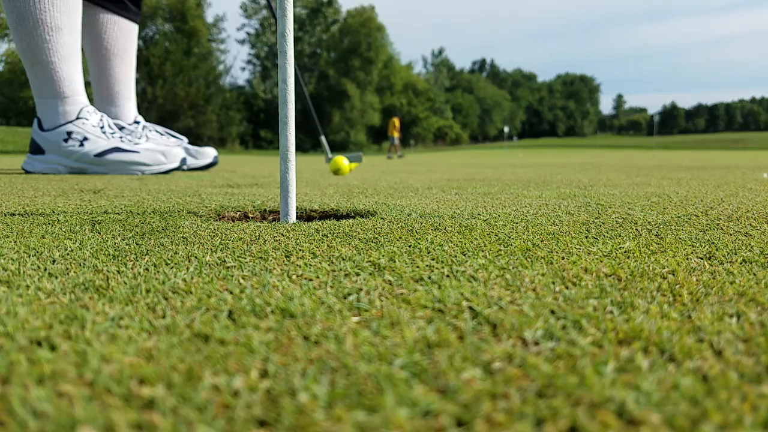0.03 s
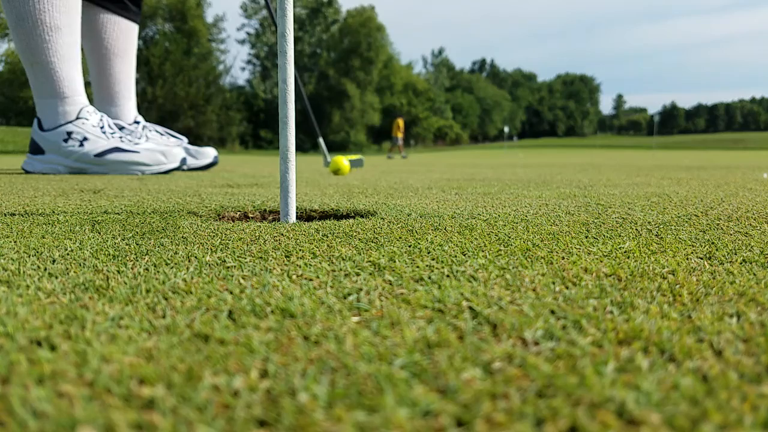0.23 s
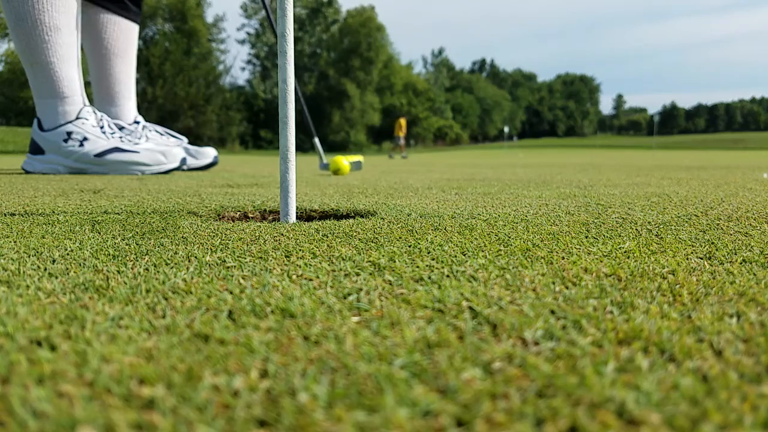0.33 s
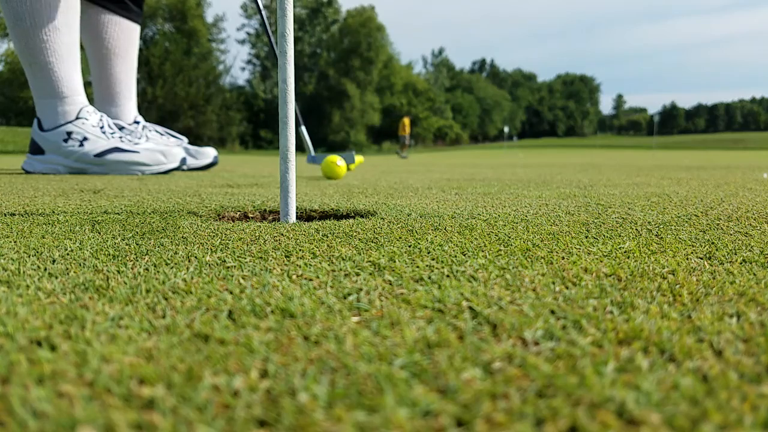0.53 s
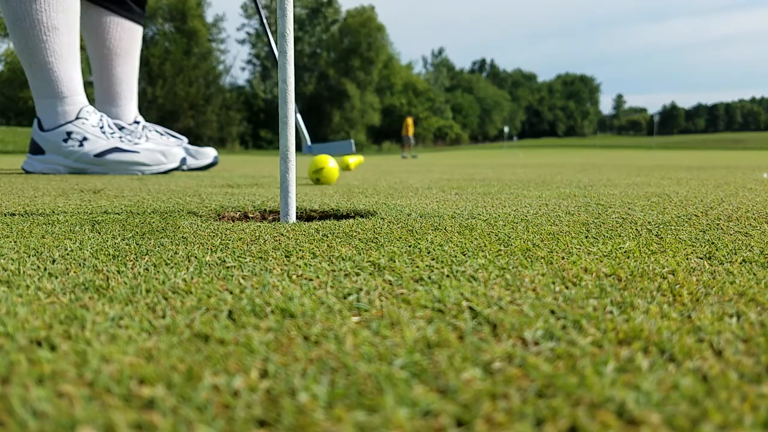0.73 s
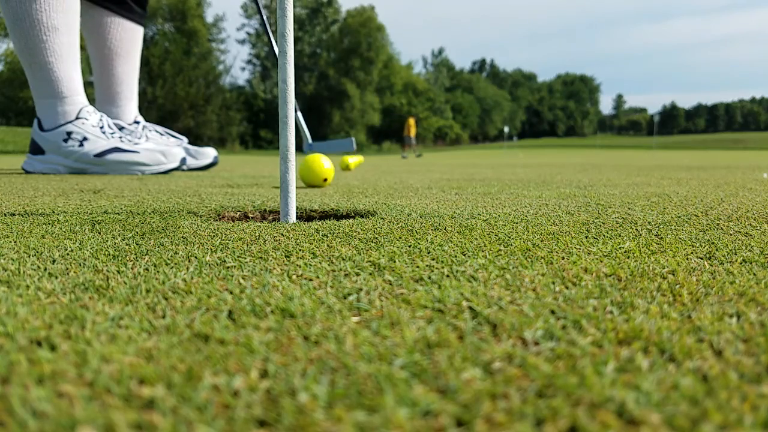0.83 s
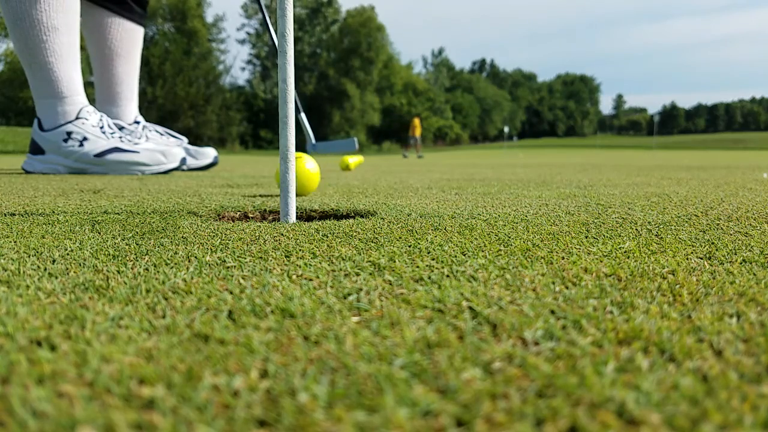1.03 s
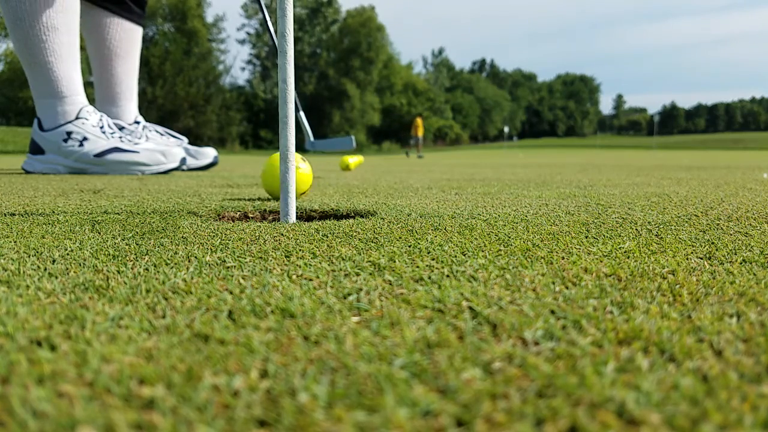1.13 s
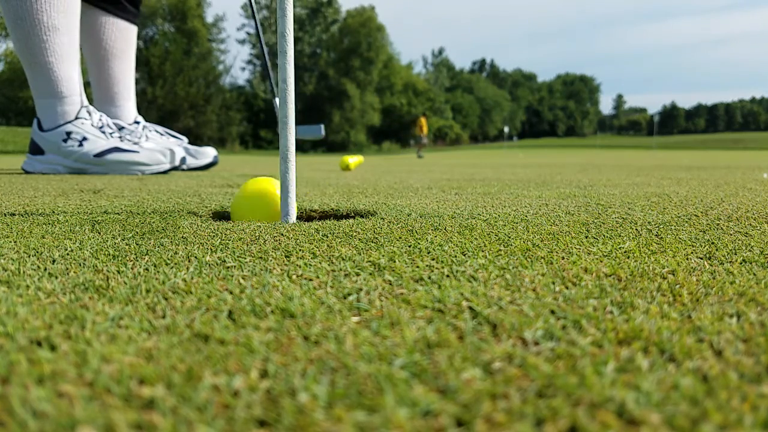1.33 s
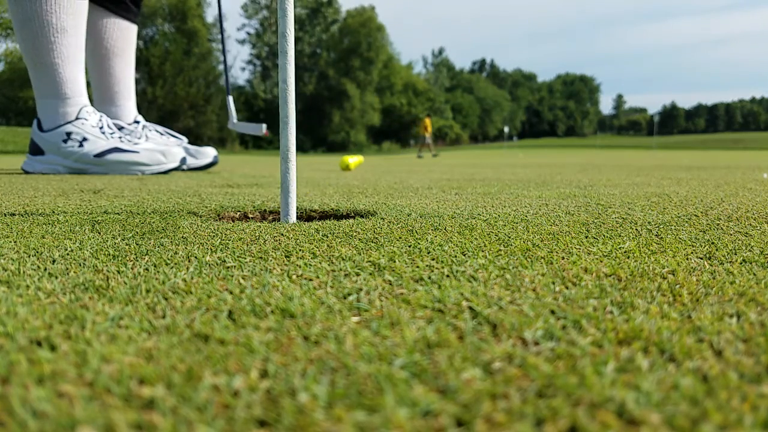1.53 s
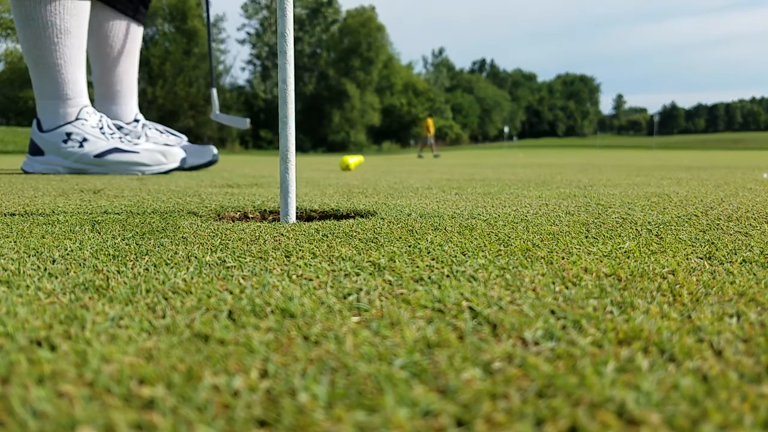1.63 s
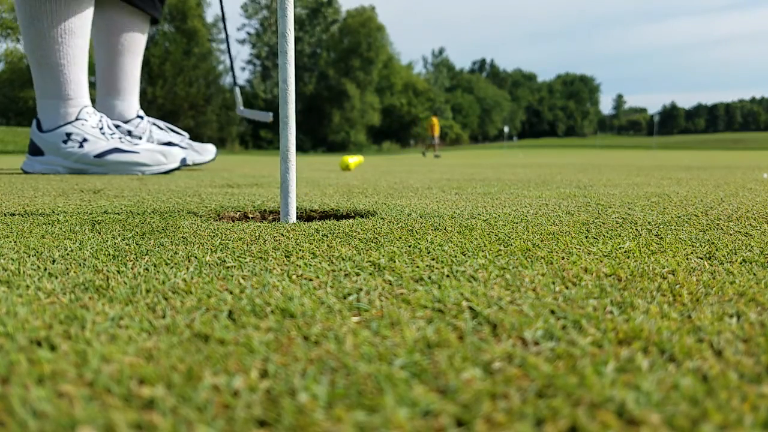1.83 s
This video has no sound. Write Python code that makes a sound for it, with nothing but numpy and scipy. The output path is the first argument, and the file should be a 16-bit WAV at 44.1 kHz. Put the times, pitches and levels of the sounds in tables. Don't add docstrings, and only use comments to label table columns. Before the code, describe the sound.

Golf putt: one crisp click, a quiet roll, then hollow clattering knocks in the hole

```python
import sys
import numpy as np
from scipy import signal
from scipy.fft import rfft, irfft, next_fast_len
from scipy.io import wavfile
from scipy.ndimage import uniform_filter1d, map_coordinates

SR = 44100
rng = np.random.default_rng(int(sys.argv[2]) if len(sys.argv) > 2 else 0)


def output_pcm(signal):
    pcm = np.clip(np.atleast_2d(signal).T, -1, 1) * 32767
    wavfile.write(sys.argv[1], SR, np.round(pcm).astype(np.int16))


def amplitude_ratio(level_db):
    exponent = np.asarray(level_db, float) / 20
    return 10 ** exponent


N = 83790

# [t/s, level/dB, tyre band level/dB]
TRAFFIC = [
    (0, -34, -6),
    (.17, -35.5, -2),
    (.3, -34, 5.5),
    (.62, -34, 5.5),
    (.8, -33, 3),
    (1.05, -33, 4),
    (1.15, -33, 1.5),
    (1.49, -32.5, 2.5),
    (1.65, -35.5, 2.5),
    (1.9, -39, -1),
]
# [f/Hz, level/dB]
DRONE_COLOUR = [(20, -23), (45, -6.5), (140, 1), (300, -8.5), (1200, -13.5), (2000, -20.5), (3500, -38),
                (6000, -49)]
# [f/Hz, likeness 0-1]
TRAFFIC_LIKENESS = [(30, .6), (130, .95), (400, .85), (750, .94), (1300, .88), (2000, .55), (3500, .2)]
# [f/Hz, level/dB]
HISS_COLOUR = [(1500, -38), (3000, 8.5), (6000, -11.5), (9500, 0), (12000, -3), (15500, 3)]
# [f/Hz, level/dB]
LEFT_OVER_RIGHT_DB = [(30, 11), (100, 8.8), (800, 9.5), (1500, 11.5), (6000, 10), (8500, 16), (10500, 10),
                      (15000, 13)]
# [t/s, f/Hz, level/dB]
ENGINE_NOTE = [
    (0, 199.3, -46),
    (.2, 231.3, -43),
    (.27, 199.7, -30.5),
    (0.331, 250.9, -35.5),
    (.4, 290.2, -39),
    (.5, 290.9, -44),
    (1.05, 250, -49.5),
    (1.15, 240.4, -33.5),
    (1.3, 252.4, -39.5),
    (1.4, 209.6, -31.5),
]
# [t/s, level/dB]
GRASS_FLICKS = [
    (1.168, -50),
    (1.202, -41),
]
# [f/Hz, level/dB, time to fall 60 dB/s]
PUTTER_HEAD = [(3980, -8, 0.01), (5230, -27, 0.008), (15400, -38, .006), (12000, -42, .004),
               (7150, -24, 0.0056), (8040, -20, 0.0076), (9100, -16.5, 0.0041), (10100, -33, .004),
               (2700, -11, 0.0077)]
# [t/s, level/dB, attack/s, hold/s, f/Hz]
CUP_HOLLOW = [(1.409, -23, 0.0019, 0.011, 1116), (1.4152, -15, 0.00064, 0.0026, 1170),
              (1.4195, -12, 0.00078, 0.0043, 1040), (1.431, -18, 0.0025, 0.0027, 1095),
              (1.4475, -15.5, 0.00079, 0.0037, 1187), (1.4535, -4, 0.00845, 0.0013, 1043),
              (1.4665, -19, .001, 0.0033, 1210), (1.476, -14, 0.0011, 0.0013, 1036),
              (1.484, -18, 0.00092, 0.002, 1100), (1.4986, -23, 0.00063, 0.0014, 1250),
              (1.509, -28, 0.0012, 0.0045, 1000), (1.5313, -8.5, 0.0008, 0.014, 1045),
              (1.545, -14, 0.0013, 0.003, 1177), (1.552, -14, 0.0045, 0.0066, 1085),
              (1.589, -16, 0.00051, 0.0019, 1030), (1.600, -19, 0.0023, 0.0056, 1055),
              (1.611, -22, .002, 0.0073, 1110)]
# [t/s, level/dB, attack/s, hold/s, f/Hz]
CUP_UPPER = [(1.4165, -26, 0.00081, 0.0027, 1960), (1.421, -26, .001, 0.0022, 2330),
             (1.432, -35, 0.00087, 0.0018, 2180), (1.4415, -30, 0.00093, .002, 1940),
             (1.4485, -29.5, 0.00055, .0015, 2650), (1.4495, -33, .0005, .0015, 1950),
             (1.462, -26, .002, 0.0033, 2110), (1.482, -30.5, .002, 0.0037, 2104),
             (1.497, -34, 0.00104, .004, 2150), (1.508, -35, .001, .004, 2230),
             (1.530, -14.5, 0.00081, 0.0015, 2180), (1.532, -14.5, 0.0013, 0.011, 1903),
             (1.552, -24, 0.002, 0.005, 2030), (1.591, -22, 0.0015, 0.008, 1918)]
# [t/s, level/dB, attack/s, hold/s, f/Hz]
CUP_THUDS = [(1.416, -18.5, 0.0016, 0.0034, 436), (1.438, -17, 0.0011, 0.013, 410),
             (1.458, -17, 0.0037, 0.016, 418.6), (1.503, -22, 0.0083, 0.0184, 421),
             (1.530, -19.5, 0.0041, 0.0134, 420), (1.545, -23.5, 0.0057, 0.038, 235),
             (1.548, -18.5, 0.0027, 0.0057, 423), (1.589, -19.5, 0.0014, 0.0027, 480),
             (1.585, -26.5, 0.0079, 0.06, 238), (1.2, -29.5, 0.0091, 0.043, 200),
             (1.601, -16.5, 0.0013, 0.0047, 414), (1.611, -21, 0.0016, 0.0073, 380),
             (1.602, -28, .001, .003, 790)]
# [t/s, crack level/dB, ring level/dB, treble tilt/dB an octave]
WALL_KNOCKS = [
    (1.4092, -20, -34, -2.5),
    (1.4165, -28, -24.5, 2.5),
    (1.4405, -20.5, -44, -3.5),
    (1.449, -23.5, -38, 0.5),
    (1.421, -18, -33, -6.5),
    (1.4565, -21.5, -20, -0.6),
    (1.466, -36, -32, 2),
    (1.4975, -46, -54, 7),
    (1.512, -39, -54, 1),
]
# [f/Hz, level/dB, time to fall 60 dB/s]
WALL_TONES = [(1450, 2.5, 0.021), (2330, -2, 0.017), (3430, 0.5, 0.016), (4030, -6, 0.056),
              (4290, -10, 0.032), (5600, -10, 0.016), (6600, -19.5, 0.13), (7050, -23, .06),
              (8800, -19, .025), (9640, -25, .03), (10300, -18.5, 0.028), (11500, -18, 0.018),
              (14400, -13, .03), (15400, -12, .035)]
# [t/s, crack level/dB, ring level/dB, treble tilt/dB an octave]
STICK_KNOCKS = [
    (1.5297, -13.5, -14.5, 2.46),
]
STICK_PITCHES = [1420, 2300, 4060, 3560, 3920, 6620, 7030, 7490, 9640, 10300, 10640, 11490, 13530, 15570]
# [level/dB, time to fall 60 dB/s]
STICK_STRENGTHS = [(12, 0.014), (-2, 0.011), (-10.5, 0.12), (8.5, 0.014), (-3.5, 0.074), (-15.5, 0.069),
                   (-20, 0.087), (-19, 0.12), (-8, 0.046), (-17, .04), (-21, 0.13), (-14.5, 0.046),
                   (-23, 0.11), (-22, .05)]
# [t/s, crack level/dB, ring level/dB, treble tilt/dB an octave]
FOOT_KNOCKS = [
    (1.5885, -23.5, -31.5, -1.6),
    (1.592, -34, -33, 0.5),
    (1.6235, -54, -58, 8),
]
# [f/Hz, level/dB, time to fall 60 dB/s]
FOOT_TONES = [(1460, 8, 0.017), (2900, -5, .015), (3960, -3.5, 0.076), (4190, -4, .05), (6570, -20, .04),
              (7500, -16, .03), (8200, -20, .02), (12400, -13, .015), (15570, -12, .04), (10600, -8.5, 0.1),
              (13530, -11, .08), (14250, -9, .035)]
# [f/Hz, level/dB]
CRACK_COLOUR = [(300, 10.5), (1400, -1), (3000, -1), (6000, -14.5), (12000, -20.5), (16000, -34)]
# [f/Hz, level/dB]
HOLE_SHADE = [(1000, -2.1), (2000, 1), (4000, -1), (8000, -11), (13000, -6)]

TRAFFIC_LAG_S, PUTT_LAG_S, CUP_LAG_S = .00038, .00004, .00013


def unit(x):
    return x / np.sqrt(np.mean(x ** 2) + 1e-20)


def along(points, hz):
    f, v = np.transpose(points)
    return np.interp(np.log(hz + 1), np.log(f + 1), v)


def wobble(rate):
    knots = rng.standard_normal(int(N * rate / SR) + 4)
    return map_coordinates(knots, [np.arange(N) * rate / SR])


def filtered(x, response):
    m = next_fast_len(x.shape[-1] + 8192)
    return irfft(rfft(x, m) * response(np.fft.rfftfreq(m, 1 / SR)), m)[..., :x.shape[-1]]


def band(centre_hz, width_hz):
    return lambda hz: np.exp(-.5 * ((hz - centre_hz) / width_hz) ** 2)


def add(track, s, x):
    track[round(s * SR):][:len(x)] += x


def pair(left, right, lag_s):
    def path(hz):
        return amplitude_ratio(-along(LEFT_OVER_RIGHT_DB, hz)) * np.exp(-2j * np.pi * hz * lag_s)
    return np.array([left, filtered(right, path)])


def patchy(patchy_db):
    z = signal.stft(rng.standard_normal((2, N)), nperseg=512)[2]
    field = uniform_filter1d(rng.standard_normal(z.shape[1:]), 4, 0)
    field = uniform_filter1d(field, 10, 1)
    return signal.istft(z * amplitude_ratio(patchy_db * unit(field)), nperseg=512)[1][:, :N]


def traffic():
    s, level_db, tyre_db = np.transpose(TRAFFIC)
    t = np.arange(N) / SR
    level = np.interp(t, s, level_db)
    drone = unit(filtered(patchy(patchy_db=.7), lambda hz: amplitude_ratio(along(DRONE_COLOUR, hz))))
    tyres = unit(filtered(patchy(patchy_db=2.5), band(centre_hz=725, width_hz=105)))
    tyres = tyres * amplitude_ratio(-12 + np.interp(t, s, tyre_db) + 1.4 * wobble(9))
    near, spread = (drone + tyres) * amplitude_ratio(level + 3.5 + .25 * wobble(7))
    air = rng.standard_normal((2, N))
    air = unit(filtered(air, lambda hz: amplitude_ratio(along(HISS_COLOUR, hz)) * (hz > 1500)))
    air = air * amplitude_ratio(-52 + 0.65 * (level - level_db.mean()))

    def alike(hz):
        return np.clip(along(TRAFFIC_LIKENESS, hz), 0, 1)
    right = filtered(near, alike) + filtered(spread, lambda hz: np.sqrt(1 - alike(hz) ** 2))
    return pair(near + air[0], right + air[1], TRAFFIC_LAG_S)


def engine():
    s, hz, db = np.transpose(ENGINE_NOTE)
    t = np.arange(N) / SR
    level_db = np.interp(t, s, db, right=-90) + 3.5 * wobble(25.86)
    pitch_hz = np.interp(t, s, hz) + 8 * wobble(29.35)
    return amplitude_ratio(level_db) * np.sin(2 * np.pi * np.cumsum(pitch_hz) / SR)


def cricket():
    start_s, gap_s, chirp_s = .055, 0.21, 0.094
    phase = (np.arange(N) / SR - start_s) / gap_s
    gate = np.sin(np.pi * np.clip(phase % 1 * gap_s / chirp_s, 0, 1)) * (phase > 0) * (phase < 7)
    noise = unit(filtered(rng.standard_normal(N), band(centre_hz=9950, width_hz=150)))
    return amplitude_ratio(-64) * gate * noise


def grass():
    out, t = np.zeros(N), np.arange(SR // 20) / SR
    for s, db in GRASS_FLICKS:
        noise = unit(filtered(rng.standard_normal(len(t)), band(centre_hz=13820, width_hz=1800)))
        add(out, s, amplitude_ratio(db - 60 * t / .02) * noise)
    return out


def putt():
    putt_s, contact_s = .40755, 0.00029
    t = np.arange(N) / SR - putt_s

    def bump(s, wide):
        return np.sin(np.pi * np.clip((t - s) / wide, 0, 1)) ** 2
    push = bump(0, contact_s)
    rebound = amplitude_ratio(-3) * bump(0.00043, 2.22 * contact_s)
    echo = amplitude_ratio(-19) * bump(0.00093, contact_s)
    u = np.maximum(t - 0.000307, 0)
    ring = np.zeros(N)
    for hz, db, t60 in PUTTER_HEAD:
        ring += amplitude_ratio(db - 60 * u / t60) * np.sin(2 * np.pi * hz * u) * (1 - np.exp(-u / 0.00053))
    thump = amplitude_ratio(-19.5 - 60 * u / .012) * np.sin(2 * np.pi * 327 * u)
    return amplitude_ratio(-4.5) * (push - rebound + echo + ring - thump)


def rings(rows, t60, rise_hz, unsteady=1):
    out, t = np.zeros(N), np.arange(SR // 8) / SR
    waver = unsteady * .45 * wobble(180)
    for s, db, attack, hold, hz in rows:
        sag_db = 3.5 * np.clip((t - attack) / hold, 0, 1)
        fade_db = 60 * np.maximum(t - attack - hold, 0) / t60
        shape = np.clip(t / attack, 0, 1) * amplitude_ratio(-fade_db - sag_db)
        turns = hz * t + .5 * rise_hz * t * t
        tone = np.sin(2 * np.pi * turns + waver[round(s * SR):][:len(t)])
        add(out, s, amplitude_ratio(db) * shape * tone)
    return out * amplitude_ratio(1.6 * wobble(400))


def knocks(rows, tones, blur_hz, diffuse, free_s):
    out, t = np.zeros((2, N)), np.arange(SR // 5) / SR
    hz0, db0, t60 = np.transpose(tones)[:, :, None]
    for s, crack_db, ring_db, tilt_db in rows:
        drift = uniform_filter1d(rng.standard_normal((3, len(tones), len(t))), size=130)
        drift = unit(drift[0] + diffuse * drift[1:])
        level_db = db0 + tilt_db * np.log2(hz0 / 4000) + 1.8 * rng.standard_normal(hz0.shape)
        level_db = level_db - 60 * t / t60 - 60 * np.maximum(t - free_s, 0) / .02
        phase = 2 * np.pi * np.cumsum(hz0 + blur_hz * drift, -1) / SR
        ring = (amplitude_ratio(level_db + 2.5 * drift[..., ::-1]) * np.sin(phase)).sum(1)
        ring = ring * (1 - np.exp(-t / 0.0015))

        def colour(hz):
            return amplitude_ratio(along(CRACK_COLOUR, hz) + tilt_db * np.log2(hz / 4000 + 0.089)) * (hz > 250)
        noise = rng.standard_normal((3, len(t)))
        noise = unit(filtered(noise[0] + diffuse * noise[1:], colour))
        fade = amplitude_ratio(-60 * t / 0.0098) + amplitude_ratio(-8 - 60 * t / 0.086)
        fade = fade * (1 - np.exp(-t / 0.00025))
        add(out.T, s, (amplitude_ratio(ring_db) * ring + amplitude_ratio(crack_db) * fade * noise).T)
    return out


def air_blow():
    start_s, length_s = 1.5303, 0.001
    phase = np.clip((np.arange(N) / SR - start_s) / length_s, 0, 1)
    return -amplitude_ratio(-7.5) * np.sin(2 * np.pi * phase) ** 3


def cup():
    hollow = rings(CUP_HOLLOW, t60=0.027, rise_hz=3100)
    upper = rings(CUP_UPPER, t60=0.027, rise_hz=7000)
    thuds = rings(CUP_THUDS, t60=0.012, rise_hz=0, unsteady=0.33)
    stick_tones = np.column_stack([STICK_PITCHES, STICK_STRENGTHS])
    wall = knocks(WALL_KNOCKS, WALL_TONES, blur_hz=131, diffuse=0.59, free_s=0.042)
    stick = knocks(STICK_KNOCKS, stick_tones, blur_hz=46.0, diffuse=0.59, free_s=0.04)
    foot = knocks(FOOT_KNOCKS, FOOT_TONES, blur_hz=85, diffuse=0.62, free_s=0.031)
    left, right = hollow + upper + thuds + air_blow() + wall + stick + foot
    right = filtered(right, lambda hz: amplitude_ratio(along(HOLE_SHADE, hz)))
    return pair(left, right, CUP_LAG_S)


def scene():
    background, note = traffic(), engine()
    tap = cricket() + grass() + putt()
    return background + pair(note, note, TRAFFIC_LAG_S) + pair(tap, tap, PUTT_LAG_S) + cup()


def low_pass(x):
    return signal.sosfilt(signal.butter(12, 16680, fs=SR, output="sos"), x)


def record(dry):
    low_cut_hz, top_hz, ceiling = 70, 15850, .97
    mic = filtered(dry, lambda hz: (1j * hz / (low_cut_hz + 1j * hz)) ** 2)
    mic = mic / (1 + np.abs(mic / ceiling) ** 8) ** (1 / 8)
    mic = filtered(mic, lambda hz: np.where(hz < top_hz, 1, amplitude_ratio(-45)))
    return low_pass(mic)


dry = scene()
out = record(dry)
output_pcm(out)
```